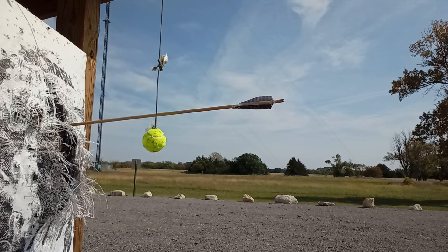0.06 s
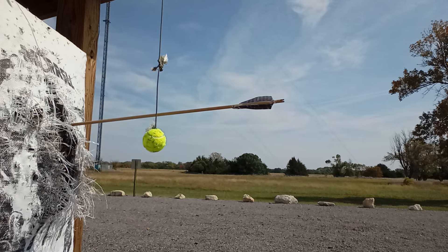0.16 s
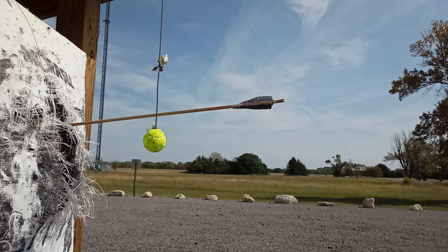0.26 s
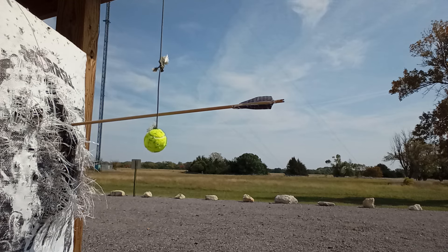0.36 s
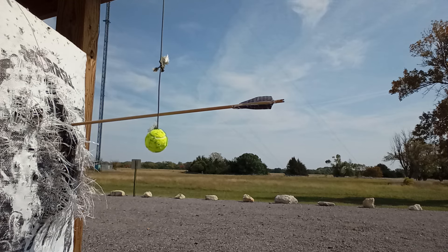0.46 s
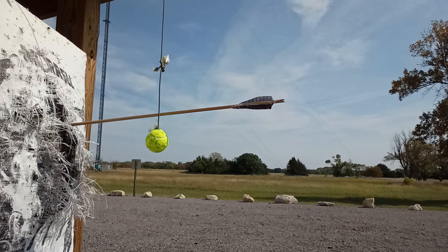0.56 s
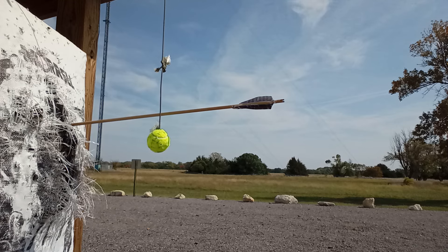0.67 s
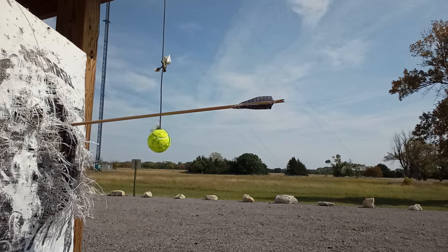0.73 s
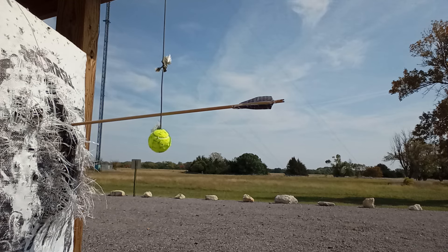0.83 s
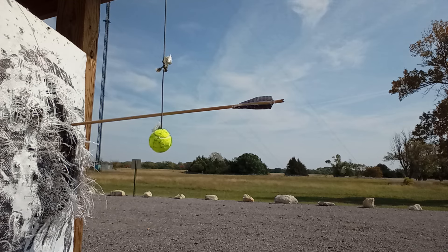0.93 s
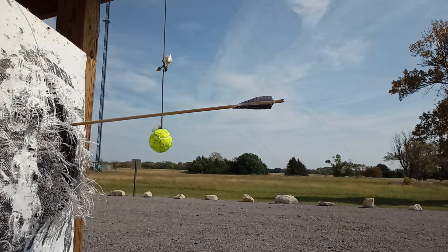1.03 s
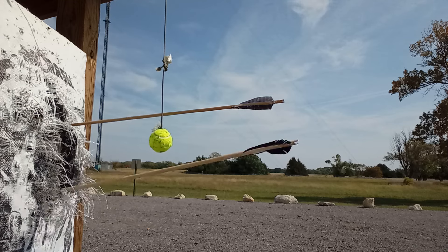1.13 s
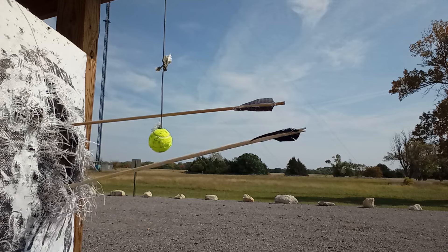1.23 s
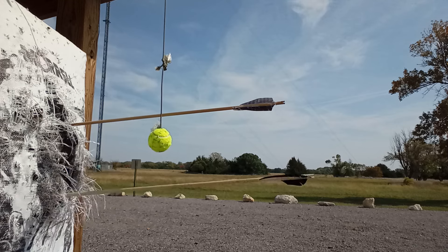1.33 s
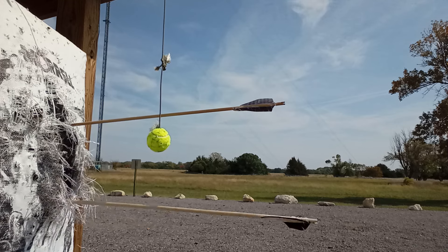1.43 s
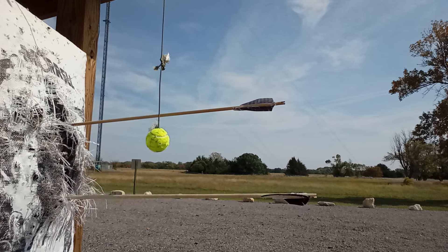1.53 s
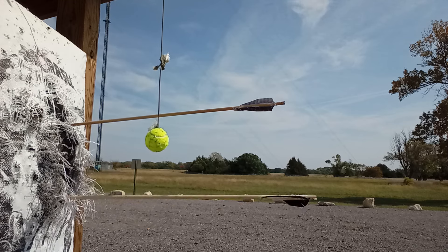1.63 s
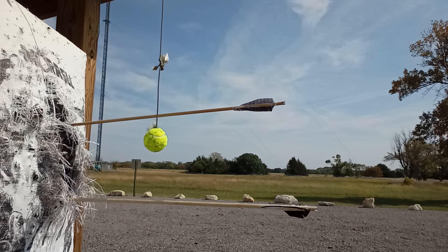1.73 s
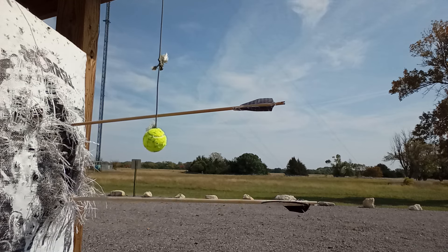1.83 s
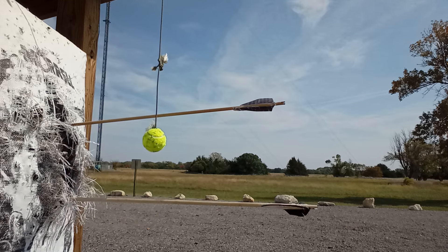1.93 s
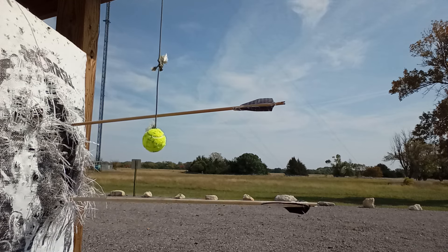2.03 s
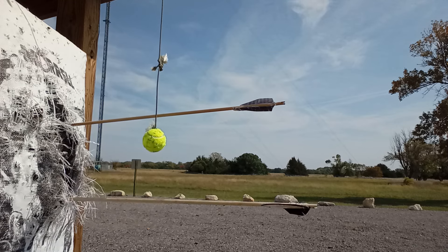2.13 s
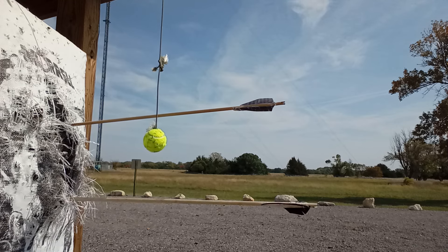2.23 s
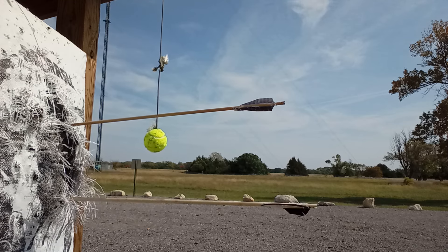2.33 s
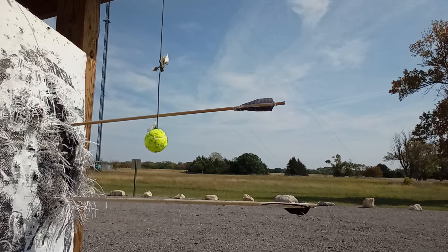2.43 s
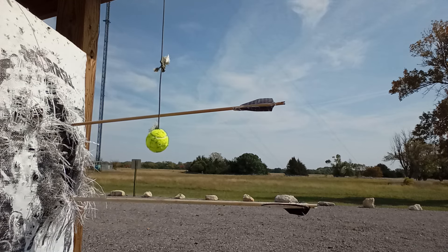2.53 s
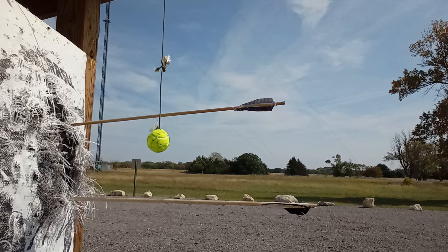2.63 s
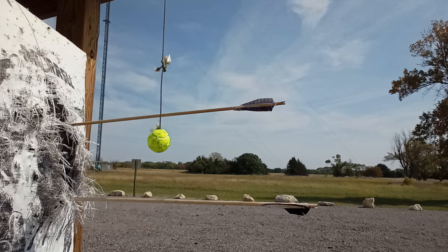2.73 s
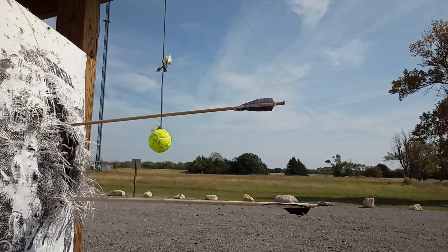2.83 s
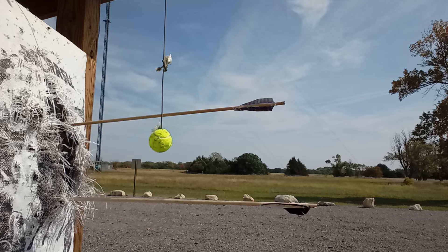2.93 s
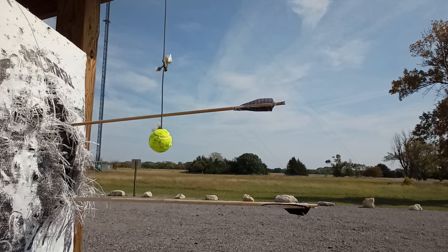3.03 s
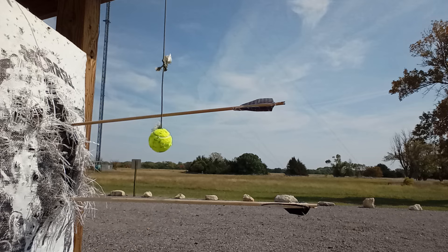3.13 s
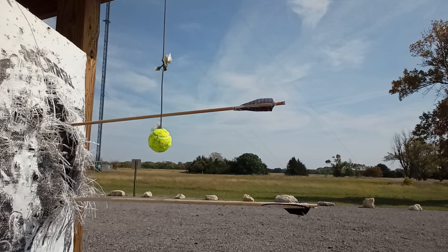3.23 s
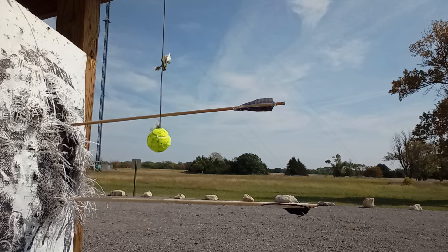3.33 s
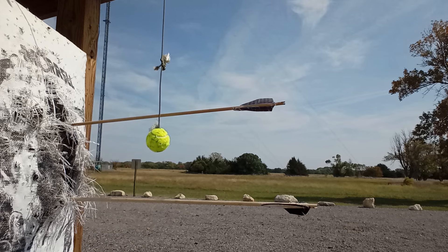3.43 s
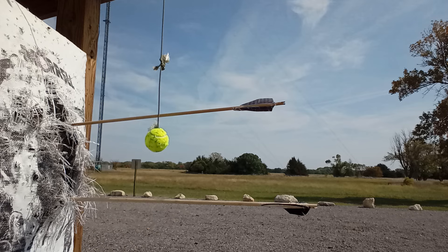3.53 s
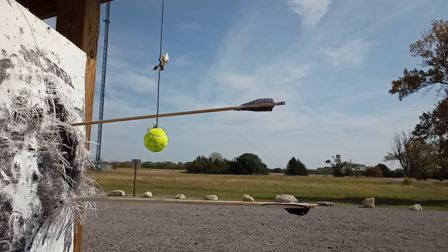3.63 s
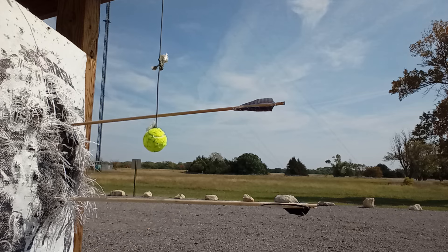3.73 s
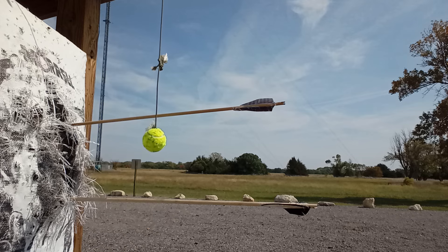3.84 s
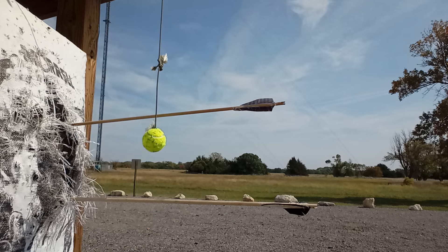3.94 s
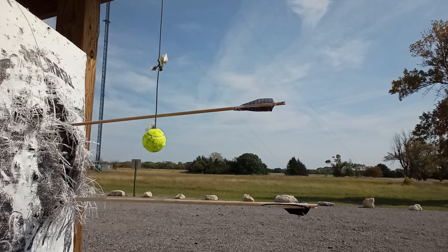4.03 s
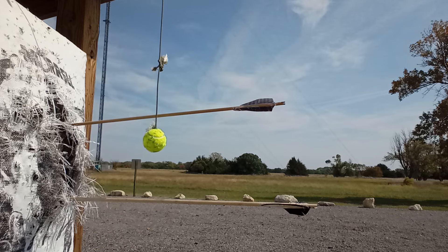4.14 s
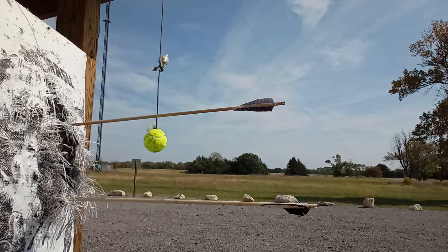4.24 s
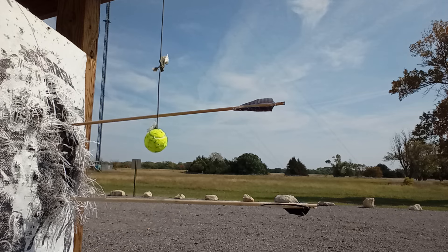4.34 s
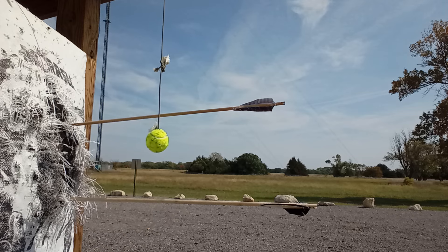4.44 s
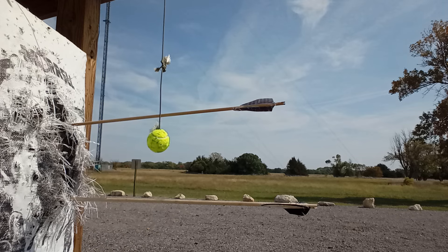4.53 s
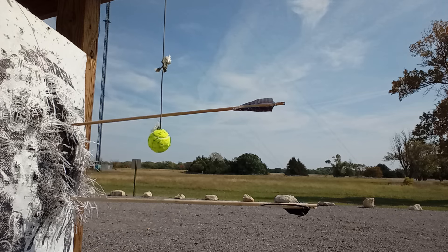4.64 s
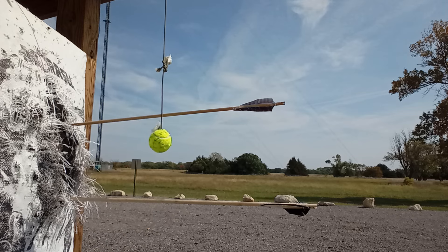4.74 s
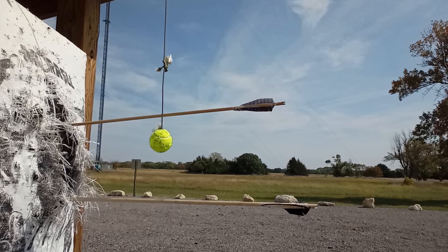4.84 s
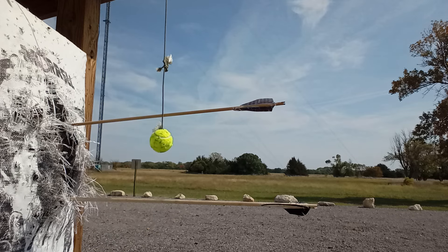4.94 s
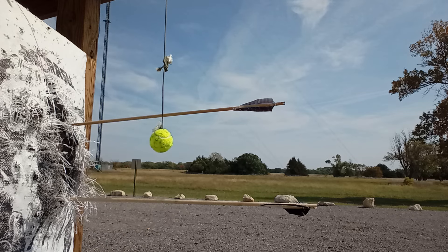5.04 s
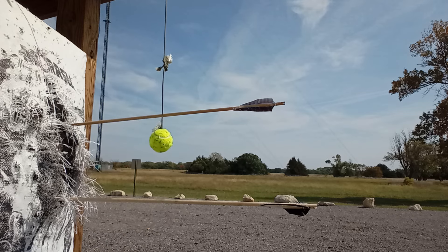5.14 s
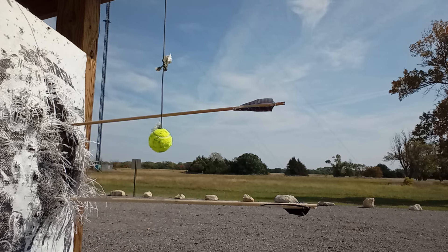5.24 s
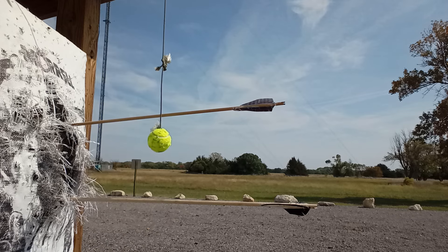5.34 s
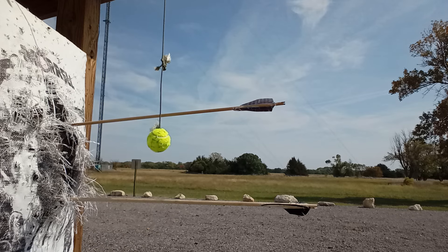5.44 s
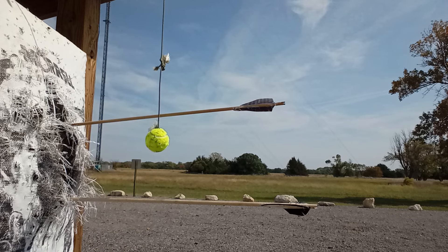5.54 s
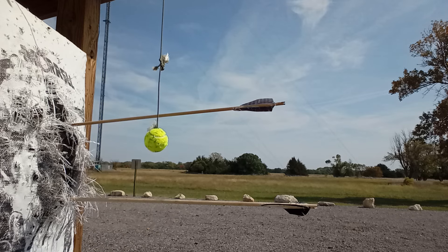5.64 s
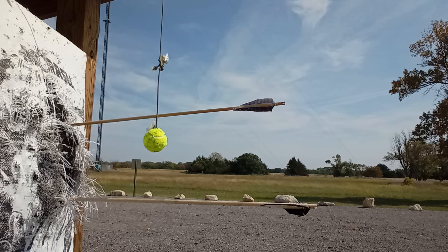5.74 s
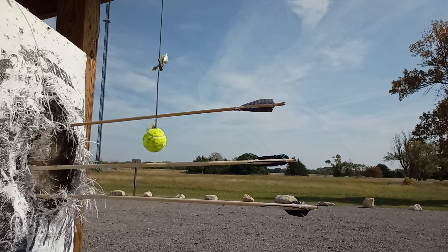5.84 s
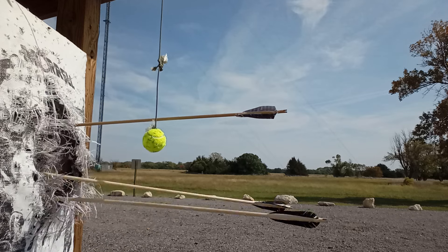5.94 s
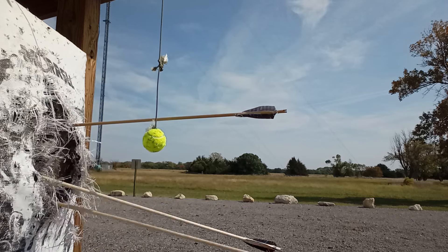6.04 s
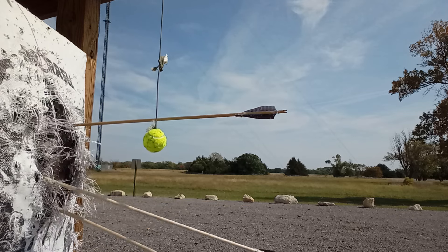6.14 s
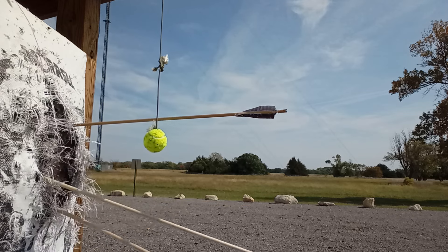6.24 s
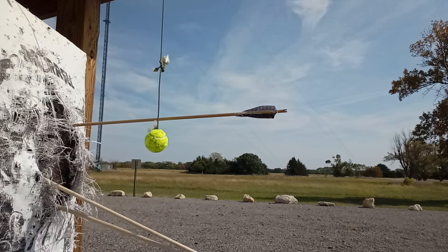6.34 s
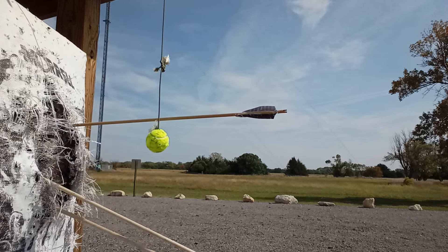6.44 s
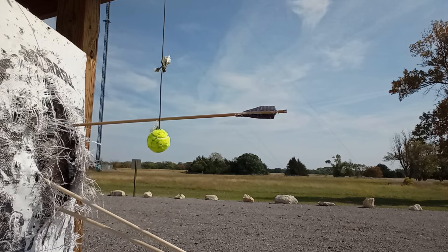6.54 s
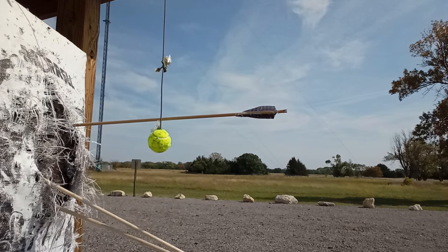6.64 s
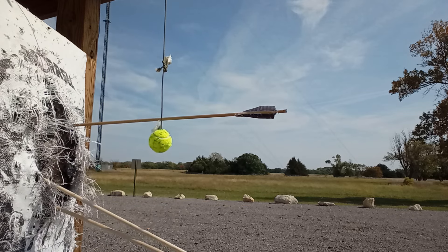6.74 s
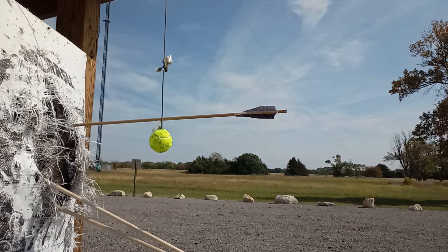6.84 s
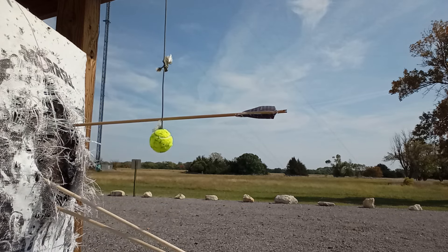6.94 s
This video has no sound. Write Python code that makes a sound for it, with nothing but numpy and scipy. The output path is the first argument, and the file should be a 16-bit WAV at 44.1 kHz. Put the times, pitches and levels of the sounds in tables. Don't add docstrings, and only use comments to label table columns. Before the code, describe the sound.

An open field in stereo, with the microphones near a fibre target on the left. Throughout, a propeller plane drones around 90 Hz, fluttering and sinking slightly as it recedes, with a soft broadband roar and faint raspy swells. Small birds whistle thinly from the start. At 0.97 s a bow on the right slaps with a bright woody snap and short ring; feathers hiss leftward and at 1.19 s the arrow hits with a tight, crunchy thud and fibrous ticks, leaving a brief rumble. Birds chirp around 2.3 s, a faint dry twig snaps right at 2.78 s, low distant coos come at 3.0 and 3.4 s, and quick chips cluster around 4.3 to 4.7 s. At 5.69 s the bow slaps again; at 5.89 s a deeper, looser thud lands. Tiny rustles, rubs and slips follow among bird notes until about 7 s as the drone continues.

```python
import sys
import numpy as np
from scipy import signal
from scipy.fft import rfft, irfft
from scipy.io import wavfile

SR = 44100
rng = np.random.default_rng(int(sys.argv[2]) if len(sys.argv) > 2 else 0)


def store_wav(level_fs):
    pcm = np.round(np.clip(np.atleast_2d(level_fs), -1, 1) * 32767)
    wavfile.write(sys.argv[1], SR, pcm.T.astype(np.int16))


def how_loud(loudness_db):
    steps = np.asarray(loudness_db, float) / 20
    return 10 ** steps


N = 307818
TIME_S = np.arange(N) / SR
RIGHT_LAG, LEFT_LEAD, THUD_LEAD = 21, 12, 16

# time in s, snap and limb level in dB, riser, scrape and flight levels in dB.
LOOSED = [
    (0.9717, -2, 6.5, -64, 2.5),
    (5.685, -1, -0.5, -59, 0.5),
]
# time in s, crunch level in dB, crunch rise in s, crunch t60 in s.
HITS = [
    (1.1892, -32, 0.001, 0.035),
    (5.892, -29, 0.0011, 0.044),
]


def in_time(rows, outside=None):
    s, *columns = np.transpose(rows)
    return [np.interp(TIME_S, s, column, outside, outside) for column in columns]


def at_hz(points, hz):
    points = np.array(points)
    return np.interp(np.log(hz + 1), np.log(points[:, 0]), points[:, 1])


def rms_one(x):
    return x / np.sqrt(np.mean(x ** 2))


def drift(rate_hz):
    count = int(N / SR * 2 * rate_hz) + 2
    points = rng.standard_normal(count)
    return rms_one(np.interp(np.linspace(0, count - 1, N), np.arange(count), points))


def bump(centre_s, half_width_s):
    return np.exp(-((TIME_S - centre_s) / half_width_s) ** 2)


def placed(x, lag, pan_db=0):
    left = np.roll(x, max(lag, 0)) * how_loud(pan_db / 2)
    right = np.roll(x, max(-lag, 0)) * how_loud(-pan_db / 2)
    return np.array([left, right])


def noise(spectrum, lag, share, tilt_db=0, bend=1):
    hz = np.fft.rfftfreq(N, 1 / SR)
    direct = placed(rng.standard_normal(N), lag)
    diffuse = rng.standard_normal((2, N))
    share = np.clip(share, 0, 1)
    shade = how_loud(np.outer([.5, -.5], tilt_db * np.minimum(hz / 11000, 1) ** bend))
    mixed = np.sqrt(share) * rfft(direct) + np.sqrt(1 - share) * rfft(diffuse)
    return mixed * how_loud(at_hz(spectrum, hz)) * shade


def hiss(*how, **more):
    return rms_one(irfft(noise(*how, **more), N))


def ring(force, hz, t60_s):
    r, w = how_loud(-60 / (t60_s * SR)), 2 * np.pi * hz / SR
    return signal.lfilter([0, np.sin(w)], [1, -2 * r * np.cos(w), r * r], force + 1e-18)


def clicks(events):
    out = np.zeros(N)
    for s, db, *_ in events:
        out[int(s * SR)] += how_loud(db)
    return out


def bursts(events, rise_s=0.0006):
    out = np.zeros(N)
    for s, db, t60_s in events:
        at = int(s * SR)
        t = np.arange(min(int(.3 * SR), N - at)) / SR
        out[at:][:len(t)] += how_loud(db - 60 * t / t60_s) * (1 - np.exp(-t / rise_s))
    return out


def held(events, end_db):
    out = 0
    for s, db, hold_s, fade_s in events:
        rows = [(s, db), (s + hold_s, db), (s + hold_s + fade_s, end_db)]
        out = out + how_loud(in_time(rows, -150)[0])
    return out


def bow():
    # s after the slap, then snap, rest, riser and limb levels in dB.
    release = [(-.038, -66, -61, -71, -55), (-.0175, -42, -44, -48, -50), (-.006, -59, -55, -52, -53),
               (.0008, -31, -41, -45.5, -46), (.0055, -44, -43.5, -47, -46),
               (0.0188, -40.5, -56, -42.5, -48.5), (.024, -56, -61, -52, -48),
               (0.047, -59, -83, -66, -47.5), (0.0655, -45, -73, -51, -55), (.072, -60, -74, -63, -63),
               (.0825, -59, -73, -63, -56), (.111, -55.5, -76, -55, -58.5)]
    # frequency in Hz, level in dB, t60 in s.
    bow_modes = [(266.7, 0.5, 0.098), (345, -22, 0.038), (544, -6.5, 0.073), (719, -8.5, 0.064),
                 (1270, -20.5, .05), (1710, -14, 0.055), (1900, -19.5, 0.026), (2740, -8, 0.042),
                 (3770, -2, 0.025), (4200, -4.5, 0.025), (4450, -3.5, 0.02), (5800, -3, 0.013)]
    # frequency in Hz, density in dB per Hz.
    snap_bands = [(180, -42), (300, -39), (828, -5), (1390, -19.5), (1690, -41), (2400, -13), (3760, 6.5),
                  (7950, -9.5), (11000, -13), (13600, -19.5), (14900, -7), (16000, -22)]
    slap_t60_s, snap_t60_s = 0.013, 0.0093
    scrape_s, scrape_fade_s = 0.034, 0.025
    limb_knock_db, riser_knock_db, rest_knock_db = 15, 20, 4
    grind = 0.84

    rows = [np.add(row, [at, db, db, riser_db, db]) for at, db, riser_db, *_ in LOOSED for row in release]
    s, snap_db, rest_db, riser_db, limb_db = np.transpose(rows)
    t60_s = np.full(len(s), slap_t60_s)

    slides = [(at - scrape_s, db, scrape_s, scrape_fade_s) for at, _, _, db, _ in LOOSED]
    scrape = held(slides, -77) * how_loud(3.3 * drift(450))
    snap = bursts(zip(s, snap_db, np.full(len(s), snap_t60_s)), 0.00035) + scrape

    limb_blow = bursts(zip(s, limb_db, 2.9 * t60_s), 0.0063)
    riser_blow = bursts(zip(s, riser_db, 3.0 * t60_s), .002) + how_loud(-2.5) * scrape
    rest_blow = bursts(zip(s, rest_db, 1.6 * t60_s))
    blows = [limb_blow, riser_blow, rest_blow]
    knock_db = [limb_db + limb_knock_db, riser_db + riser_knock_db, rest_db + rest_knock_db]
    knocks = [clicks(zip(s + 0.0012, db)) for db in knock_db]

    wood = np.zeros(N)
    for hz, db, decay_s in bow_modes:
        part = int(hz > 1000) + int(hz > 2200)
        force = grind * rng.standard_normal(N) * blows[part] + knocks[part]
        wood += how_loud(db - 17.0) * ring(force, hz, decay_s)
    return placed(wood, RIGHT_LAG) + how_loud(-2.0) * snap * hiss(snap_bands, RIGHT_LAG, 0.17, tilt_db=-10.5)


def string_ticks():
    # time in s, level in dB, t60 in s.
    tick_events = [(.9545, -51.5, .02), (.9718, -40, .008), (.9895, -56, .008), (1.0176, -60, .008),
                   (1.0361, -49, .008), (1.0426, -47.5, 0.0092), (1.0535, -51, .012), (1.0725, -58, 0.0096),
                   (1.0805, -58, .008), (1.1169, -59.5, 0.0086), (5.6673, -64, .01), (5.6852, -44, 0.0074),
                   (5.6905, -54, .008), (5.7035, -58, .008), (5.7306, -62, .008), (5.7496, -57, 0.0067),
                   (5.7565, -52, .008), (5.7675, -57, .01), (5.786, -60, 0.009)]
    # frequency in Hz, density in dB per Hz.
    tick_bands = [(4000, -24), (8000, -12), (11000, -4), (13600, -12.5), (14900, -4), (15600, -7.5),
                  (16300, -18.5)]
    return bursts(tick_events, .0003) * hiss(tick_bands, RIGHT_LAG, .4, tilt_db=-10.0)


def shudder():
    # time in s, level in dB, hold in s, fade in s.
    shudders = [
        (.965, -54.5, 0.081, 0.018),
        (17, -68, 0.047, 0.028),
        (1.21, -63, 0.102, 0.071),
    ]
    # frequency in Hz, density in dB per Hz.
    shudder_bands = [(180, -25.5), (280, 0), (420, -6), (650, -1.5), (950, -4), (1250, -21), (2500, -42)]
    return held(shudders, -98) * how_loud(1.5 * drift(48)) * hiss(shudder_bands, RIGHT_LAG, 0.44)


def flight():
    # frequency in Hz, density in dB per Hz.
    air_bands = [(590, -51), (1000, -18.5), (2030, 1), (3080, -4.5), (4470, -1.5), (8070, -10),
                 (11000, -13.5), (13600, -14), (14900, -1), (16000, -9)]
    whip_db, whip_t60_s = -58.5, 0.11
    far_db, near_db, closing = -66, -58, 4.5
    level = bursts([(s - .004, whip_db, whip_t60_s) for s, *_ in LOOSED], 0.0018)
    for (start_s, *_, db), (end_s, *_) in zip(LOOSED, HITS):
        way = np.clip((TIME_S - start_s) / (end_s - start_s), 0, 1)
        flying = (way > 0) * (way < 1)
        level = level + how_loud(db + far_db + (near_db - far_db) * way ** closing) * flying
    return level * hiss(air_bands, RIGHT_LAG, .2, tilt_db=-11.5) * how_loud(1.0)


def impacts():
    # frequency in Hz, density in dB per Hz.
    crunch_bands = [
        [(530, -35.5), (900, -4.5), (1450, -11.5), (2190, -16.5), (2760, -18), (3110, -11), (4120, -9.5),
         (6460, -20), (9500, -26.5), (12500, -19.5), (13800, -23.5), (14800, -17.5), (15400, -17), (16500, -31)],
        [(530, -19), (850, -2.5), (1300, -5.5), (2240, -6), (2500, -16.5), (3690, -5.5), (4500, -12.5),
         (5390, -9.5), (6700, -15.5), (9780, -22.5), (12500, -17.5), (13700, -18.5), (14800, -17), (15300, -11),
         (15600, -28), (16500, -44.5)],
    ]
    # time in s, push in dB, length in s.
    brakings = [
        [(1.1902, -9.5, 0.0037), (1.1941, -6.5, 0.0034)],
        [(5.8932, -1.5, 0.00358), (5.8962, -11.5, 0.0039), (5.9035, -18, .004)],
    ]
    # frequency in Hz, level in dB, t60 in s.
    target_modes = [
        [(209.4, -3.5, 0.042), (276, 3.5, 0.023), (370, -13, 0.062), (550, 7.5, 0.033), (790, -12, 0.045),
         (1030, -24.5, .03)],
        [(135, -4.5, 0.1), (192.5, 1.5, 0.06), (216, 5.5, 0.037), (406, -1, 0.041), (484, 0.5, 0.026),
         (880, -35, 0.033)],
    ]
    cutoffs_hz = [273, 150]
    # time in s, level in dB, t60 in s.
    layer_tears = [
        [(1.1899, -25, 0.011), (1.1910, -29, .01), (1.1921, -30.5, 0.016), (1.1941, -26.5, 0.014),
         (1.1951, -28, .013), (1.1977, -33, 0.0153), (1.2005, -32.5, 0.01213), (1.2028, -43, .012)],
        [(5.8895, -45, 0.016), (5.8922, -22.5, 0.014), (5.8934, -21.5, 0.017), (5.8946, -25, .014),
         (5.8958, -26, 0.015), (5.8983, -32, .014), (5.9005, -32, .014), (5.9045, -38.5, .015)],
    ]
    # frequency in Hz, level in dB, t60 in s.
    shaft_modes = [
        [(522, -11.5, .035), (800, -14, 0.021), (1025, -7.5, 0.024), (1980, -25, .02), (2440, -18, .02),
         (3190, -6, .008), (3934, -4.5, 0.0071)],
        [(516, -21, .03), (734, -16.5, .025), (848, -9.5, 0.018), (1107, -20, .015), (1410, -12.5, .015),
         (1900, -13.5, .015), (2210, -16.5, 0.017), (3070, -8, 0.008), (3750, -1, 0.0057)],
    ]

    out = np.zeros((2, N))
    snags = how_loud(0.92 * drift(700))
    arrows = zip(HITS, crunch_bands, brakings, target_modes, cutoffs_hz, layer_tears, shaft_modes)
    for (s, crunch_db, rise_s, t60_s), bands, jerks, modes, cut_hz, tears, shaft in arrows:
        level = bursts([(s, crunch_db, t60_s)], rise_s) + bursts(tears, 0.0011)
        out += hiss(bands, -LEFT_LEAD, 0.65, tilt_db=7.5, bend=2.2) * snags * level

        struck = clicks(tears)
        out += placed(sum(how_loud(db) * ring(struck, hz, decay_s) for hz, db, decay_s in shaft), -LEFT_LEAD)

        force = np.zeros(N)
        for start_s, push_db, length_s in jerks:
            u = np.clip((TIME_S - start_s) / length_s, 0, 1)
            force -= how_loud(push_db) * np.sin(2 * np.pi * u) ** 3 / (length_s * SR)
        thud = sum(how_loud(db + 0.5) * ring(force, hz, decay_s) for hz, db, decay_s in modes)
        high_pass = signal.butter(2, cut_hz, "high", fs=SR, output="sos")
        out += placed(signal.sosfilt(high_pass, thud), -THUD_LEAD)
    return out


def grazes():
    # time in s, level in dB, t60 in s.
    graze_events = [(1.1872, -28, 0.018), (1.1897, -26, 0.02), (1.1918, -21.5, .012), (1.1955, -34, .01),
                    (5.8905, -35.5, 0.015), (5.8955, -27.5, 0.016), (5.8995, -37.5, 0.027)]
    # frequency in Hz, density in dB per Hz.
    graze_bands = [(5000, -32), (11000, -23.5), (12500, -15), (13700, -18), (14600, 2), (15400, 0),
                   (16300, -26.5)]
    return bursts(graze_events, .0008) * hiss(graze_bands, -LEFT_LEAD, 0.36, tilt_db=11.0)


def frame():
    # time in s, level in dB, t60 in s.
    rumbles = [
        (1.2, -57, 0.57),
        (5.905, -47, 0.49),
    ]
    # frequency in Hz, density in dB per Hz.
    frame_bands = [(120, -28.5), (220, 1), (520, -3.5), (900, -25.5), (2000, -49)]
    return bursts(rumbles, .006) * hiss(frame_bands, -THUD_LEAD, 0.36)


def settling():
    # time in s, level in dB, hold in s, fade in s.
    settles = [
        (1.205, -51.5, 0.0046, .08),
        (5.91, -58, 0.056, 0.026),
    ]
    # time in s, peak in dB, t60 in s.
    slips = [(6.0203, -61.5, 0.032), (6.0392, -66, 0.028), (6.0636, -65, 0.016), (6.124, -59, 0.022),
             (6.2307, -57.5, 0.021), (6.3047, -62.5, 0.025), (6.3535, -60, 0.02), (6.3755, -59, 0.016),
             (6.6194, -67.5, 0.022), (6.9468, -65.5, 0.017)]
    # frequency in Hz, density in dB per Hz.
    rustle_bands = [(240, -40), (400, -7), (814, -4), (1030, -35), (1140, -21.5), (2090, -22.5),
                    (3210, -11), (8110, -18), (15000, -21), (16000, -24.5)]
    # time in s, level in dB, hold in s, fade in s.
    quivers = [
        (1.26, -83, 0.05, 0.5),
        (5.0, -95.5, .55, 0.11),
        (5.985, -81, 0.42, 0.072),
        (6.42, -87, 0.39, 0.031),
    ]
    # frequency in Hz, density in dB per Hz.
    rub_bands = [(3000, -10.5), (7000, -4), (8800, -11), (10500, 0.5), (12500, -9), (14000, -5.5),
                 (15000, 1.5)]
    settled_db, still_db = -79, -99
    level = how_loud(3.5) * held(settles, settled_db) * how_loud(1.4 * drift(70)) + how_loud(1.0) * bursts(slips)
    rustle = level * hiss(rustle_bands, -LEFT_LEAD, 0.13, tilt_db=2.0)
    rub = held(quivers, still_db) * hiss(rub_bands, -LEFT_LEAD, 0.14, tilt_db=-1.5)
    return rustle + how_loud(8.0) * rub


def plane():
    # time in s, pitch in Hz, level in dB, 3rd multiple in dB.
    drone = [(0, 95.46, -48, -80), (.25, 93.92, -44, -77), (.5, 94.5, -45, -78), (.72, 93.56, -43, -75),
             (1.0, 93.3, -51, -58), (1.35, 91.9, -42.5, -65), (2.2, 90.88, -41.5, -69.5),
             (2.45, 89.88, -49.5, -68.5), (2.68, 89.7, -47, -69.5), (2.83, 88.77, -48, -65),
             (3.2, 89.1, -40.5, -66), (3.7, 87.1, -50, -66), (4.1, 86.8, -42.5, -66),
             (4.55, 88.6, -44, -63.5), (4.9, 88.17, -41.5, -63), (5.6, 86.7, -44, -68),
             (6.2, 85.53, -47, -70), (6.98, 86.05, -50.5, -66.5)]
    # multiple of the pitch, level in dB against the 3rd.
    overtones = [(1.25, -1), (1.5, -11.5), (2.5, -5), (3.75, -18), (4, -14.5), (5, -14.5), (6, -21),
                 (8, -18.5), (9, -19)]
    # time in s, change in dB.
    dips = [(.51, -6), (.86, -4), (1.05, -6), (1.21, -10), (2.62, -3), (2.771, -10), (2.87, -7.5),
            (3.31, -5), (4.032, -6.5), (5.16, -8.5), (5.46, -3), (5.885, -4), (6.13, -5), (6.25, -3.5),
            (6.32, -3), (6.53, -2), (6.68, 0), (6.79, -6)]
    # time in s, gain in dB, half width in s.
    exhaust_swells = [(.2, 8, .3), (1.7, 10, .15), (2.4, 9, .3), (3.3, 15, .3), (3.85, 10, .15),
                      (4.72, 16, .15), (5.0, 9, .15), (5.3, 15, .17), (6.3, 13, .3)]
    second_db, second_follows, exhaust_db = -64, 0.19, -81
    second_early_db = 1.5
    second_gains_db, second_gains_s = 3.5, 4.7

    hz, level_db, third_db = in_time(drone)
    first_db = level_db + 0.87 * drift(4.3) + sum(db * bump(s, 0.02) for s, db in dips)
    second_db = second_db + second_follows * (third_db - third_db.mean()) + 1.9 * drift(2.4)
    second_db += second_gains_db / 2 * np.tanh(3.3 * (TIME_S - second_gains_s))
    second_db += second_early_db * np.exp(-(TIME_S / 1.7) ** 4)

    phase = 2 * np.pi * np.cumsum(hz) / SR + 0.081 * drift(3.3) + 0.012 * drift(46)
    out = how_loud(first_db + 0.79 * drift(12) + 0.6 * drift(87)) * np.sin(phase)
    out += how_loud(second_db + 2.2 * drift(15)) * np.sin(2 * phase + 1)
    out += how_loud(third_db + 0.97 * drift(8.1)) * np.sin(3 * phase + 2)
    for k, db in overtones:
        wander = 0.11 * k * drift(20) + 1.5 * drift(3.2)
        out += how_loud(third_db.mean() + db + 3.9 * drift(5.1)) * np.sin(k * phase + wander)
    out += how_loud(-76 + 3 * drift(2.5)) * np.sin(2 * np.pi * 62.5 * TIME_S)

    rough = rms_one(ring(ring(rng.standard_normal(N), 715, .03), 735, .03))
    tones = sum(how_loud(3 * drift(6)) * np.sin(k * phase + .7 * drift(20)) for k in (8, 8.5))
    rasp_db = exhaust_db + sum(db * bump(s, width_s) for s, db, width_s in exhaust_swells)
    rasp = how_loud(rasp_db + 3.5 * drift(12)) * (.6 * rough + .7 * tones)
    return placed(np.sqrt(2) * out + rasp, RIGHT_LAG)


def slurred(rows, start, end):
    return [(s, length_s, hz * (1 + start * depth), hz, hz * (1 + end * depth), db)
            for s, length_s, hz, db, depth in rows]


def calls(notes, buzz_hz, depth, waver=.0045):
    out = np.zeros((2, N))
    pans_db = rng.normal(0, 2.2, len(notes))
    shake = 1 + waver * drift(70)
    for (s, length_s, first_hz, middle_hz, last_hz, db), pan_db in zip(notes, pans_db):
        u, at = np.linspace(0, 1, int(length_s * SR)), int(s * SR)
        arc = np.polyfit([0, .5, 1], [first_hz, middle_hz, last_hz], 2)
        hz = np.polyval(arc, u) * shake[at:][:len(u)]
        shape = np.minimum(1, 5 * np.minimum(u, 1 - u))
        shape = shape * (1 + depth * np.sin(2 * np.pi * buzz_hz * length_s * u))
        note = how_loud(db) * shape * np.sin(2 * np.pi * np.cumsum(hz) / SR)
        out[:, at:at + len(u)] += placed(note, 0, pan_db)
    out = out * how_loud(2.5 * drift(60))
    scatter = rng.standard_normal((2, 3000)) * how_loud(-28 - 60 * np.arange(3000) / SR / .14)
    return out + signal.fftconvolve(out, scatter, axes=1)[:, :N]


def birds():
    # time in s, length in s, pitch in Hz, level in dB.
    chips = [(2.09, 0.17, 9000, -92), (4.214, 0.03, 4200, -79), (4.22, 0.036, 3450, -83),
             (4.277, .04, 3380, -82), (4.292, 0.026, 3920, -72), (4.328, 0.035, 3910, -71.5),
             (4.366, 0.025, 3980, -72.5), (4.488, 0.042, 5990, -72.5), (4.605, .02, 3560, -76),
             (4.625, 0.042, 3520, -75.5), (4.43, .02, 3500, -79), (4.382, 0.014, 6730, -89),
             (4.395, .016, 6150, -88), (4.445, .014, 5330, -85), (4.475, .015, 4450, -83),
             (6.15, 0.082, 3740, -78), (6.312, .03, 5780, -82), (6.02, .016, 6700, -80),
             (4.728, 0.038, 4280, -74), (5.0, .04, 5870, -91), (5.24, 0.043, 7460, -91),
             (5.442, 0.027, 5650, -87.5), (5.602, 0.075, 5230, -68), (4.643, 0.031, 5500, -76.5),
             (5.83, 0.059, 4460, -68), (6.11, .02, 4500, -75), (6.132, 0.034, 4540, -68),
             (6.175, 0.046, 4350, -82), (6.195, 0.03, 4800, -83), (6.23, 0.042, 5430, -80),
             (6.25, .05, 7750, -86), (6.23, .035, 6100, -79), (6.503, .02, 5250, -84),
             (6.268, 0.03, 3760, -82), (6.399, 0.032, 4450, -78), (6.406, 0.026, 5330, -78),
             (6.487, 0.037, 4250, -93), (6.572, 0.055, 4740, -75)]
    # time in s, length in s, middle pitch in Hz, level in dB, bend as a share of pitch.
    rises = [(.06, 0.029, 7560, -72.5, 0.051), (.55, .2, 7800, -95, 0.044), (.71, 0.06, 5130, -70.5, 0.092),
             (1.5, 0.084, 9000, -85, .06), (2.325, 0.047, 5180, -68.5, 0.15),
             (5.575, 0.04, 5080, -79, 0.065)]
    falls = [(2.34, .06, 4300, -84, .047), (3.04, .12, 8000, -93, .137), (3.72, .08, 7850, -94, .115),
             (4.45, .125, 7850, -88, .11), (4.59, .06, 5900, -90, .06), (5.98, .06, 3880, -76, .035),
             (6.045, .12, 3820, -76, .02)]
    scoops = [(0, 0.073, 6410, -67.5, 0.3), (.795, 0.097, 7140, -71.5, 0.054),
              (1.41, 0.13, 8350, -80, .015), (2.22, 0.1, 7260, -74, 0.014),
              (2.413, 0.068, 6540, -69.5, 0.014)]
    hooks = [(2.375, 0.046, 7430, -79, .11), (3.81, 0.086, 6440, -80, 0.25), (5.31, 0.076, 6900, -87, 0.18)]
    trills = [(2.555, 0.064, 6540, -81, 0.083), (6.06, 0.069, 6680, -75, 0.011),
              (6.272, 0.056, 6860, -79, 0.017), (6.31, 0.063, 6230, -71, 0.01)]
    coos = [
        (2.28, 0.1, 548, -72.5, .05),
        (3.0, 0.22, 502, -69, 0.3),
        (3.42, 0.16, 500, -69, 0.19),
    ]
    whistles = slurred([row + (.006,) for row in chips], 0.75, -1)
    whistles += slurred(rises, -1.1, 0.3) + slurred(falls, 1.0, -1.8)
    whistles += slurred(scoops, 0.92, 1.0) + slurred(hooks, -.25, -1)
    out = calls(whistles, 83, 0.14)
    out += calls(slurred(trills, 0.67, -1.3), 190, 1.0, waver=0.0067)
    return out + calls(slurred(coos, -0.74, -1.4), 33, 0.79, waver=0.07)


def twig():
    # frequency in Hz, level in dB, t60 in s.
    twig_modes = [(1950, -52, 0.018), (3700, -57, .012), (5300, -63, .008), (6200, -64, .008),
                  (9550, -80, .004)]
    snap_s = 2.780
    force = clicks([(snap_s + .0012, -1), (snap_s + .0103, -8), (snap_s + .049, -7)])
    force += bursts([(snap_s - .001, -13, .05)]) * rng.standard_normal(N)
    return placed(sum(how_loud(db) * ring(force, hz, t60_s) for hz, db, t60_s in twig_modes), RIGHT_LAG)


def field(patchy_db=1.5):
    # frequency in Hz, density in dB per Hz.
    roar_bands = [(30, -1), (75, 9), (150, 3), (550, -5), (760, 3.5), (1200, -0.5), (1900, -3),
                  (2900, -9.5), (3900, -12), (7500, -30.5), (8200, -37), (10500, -36), (13800, -37),
                  (14600, -27.5)]
    # frequency in Hz, share arriving from the plane.
    plane_share = [(30, .6), (80, 0.75), (300, 0.97), (800, 0.43), (2000, 0.54), (4000, 0.077), (9000, .05)]
    roar_db, fade_db_per_s, swell_db = -66.5, 0.26, 0.87
    peak_s, peak_db, peak_width_s = 2.2, 1.5, 0.31
    hz = np.fft.rfftfreq(N, 1 / SR)
    whole, out = noise(roar_bands, RIGHT_LAG, at_hz(plane_share, hz)), 0
    place = np.clip(2 * np.log2((hz + 1) / 100), 0, 13)
    for k in range(14):
        band = np.clip(1 - abs(place - k), 0, 1)
        patches = .3 * drift(1.5) + drift(9) + .6 * drift(30)
        out = out + irfft(whole * band, N) * how_loud(patchy_db * min(1, (14 - k) / 4) * patches)
    level_db = roar_db - fade_db_per_s * TIME_S + swell_db * drift(0.67)
    level_db += peak_db * bump(peak_s, peak_width_s)
    return rms_one(out) * how_loud(level_db + 5.5)


def scene():
    shots = bow() + string_ticks() + shudder() + flight()
    target = impacts() + grazes() + frame() + settling()
    return shots + target + plane() + birds() + twig() + field()


def top_cut(x):
    return signal.sosfilt(signal.butter(12, 16780, fs=SR, output="sos"), x)


def record(dry):
    low_pass = signal.cheby2(14, 20, 15750, fs=SR, output="sos")
    mix = signal.sosfilt(low_pass, dry)
    return top_cut(mix)


dry = scene()
out = record(dry)
store_wav(out)
```